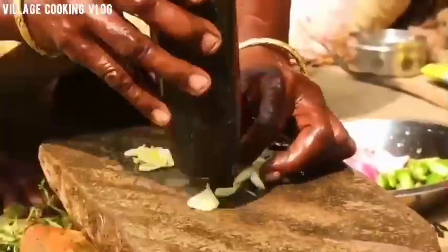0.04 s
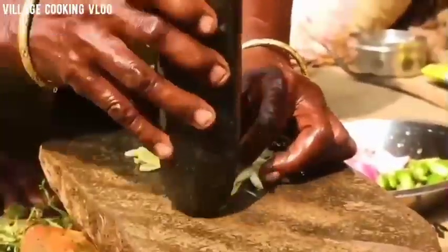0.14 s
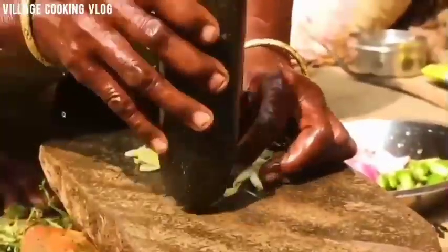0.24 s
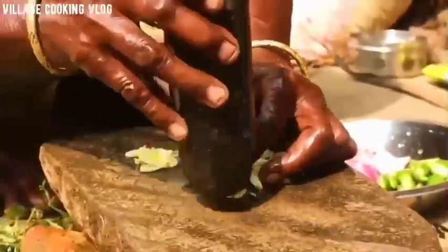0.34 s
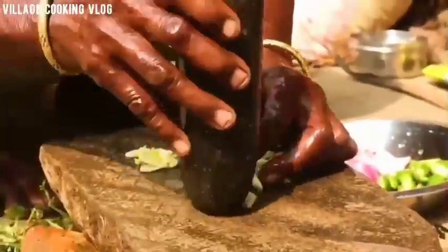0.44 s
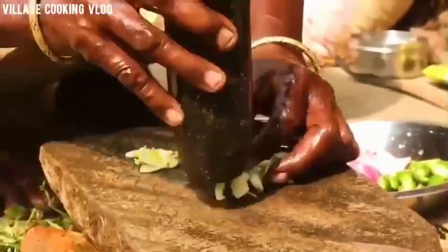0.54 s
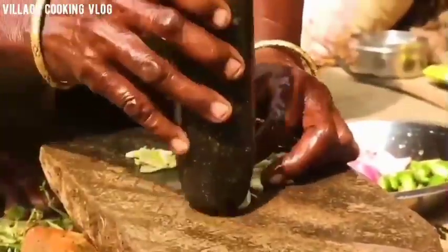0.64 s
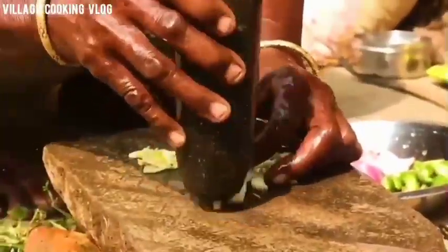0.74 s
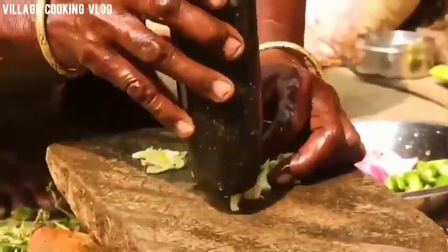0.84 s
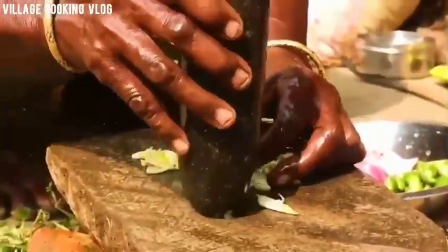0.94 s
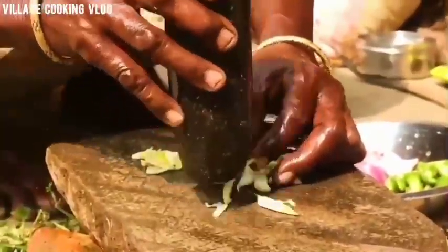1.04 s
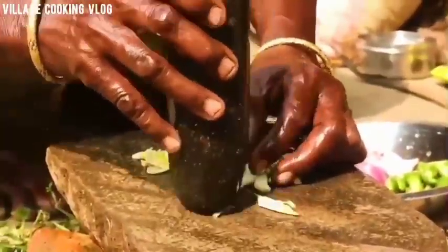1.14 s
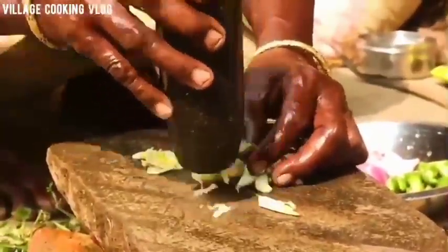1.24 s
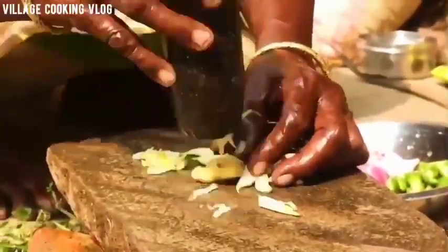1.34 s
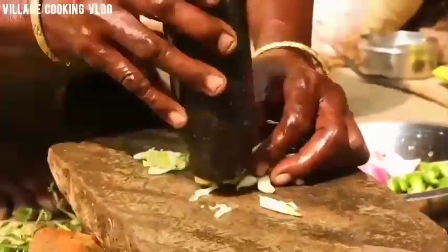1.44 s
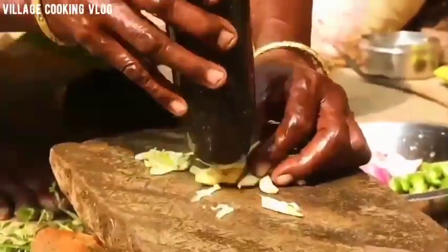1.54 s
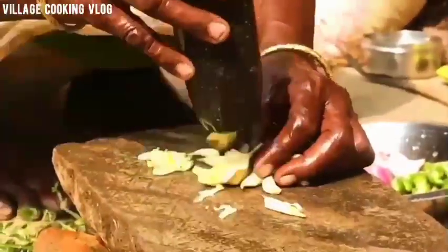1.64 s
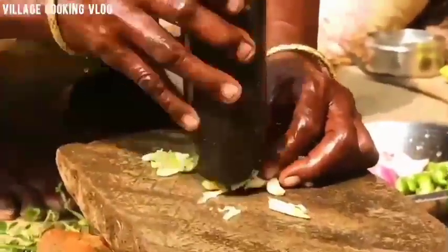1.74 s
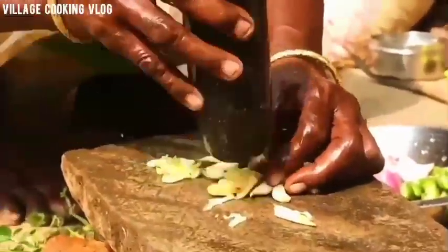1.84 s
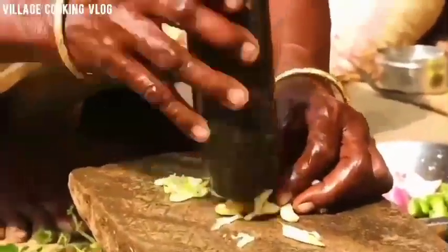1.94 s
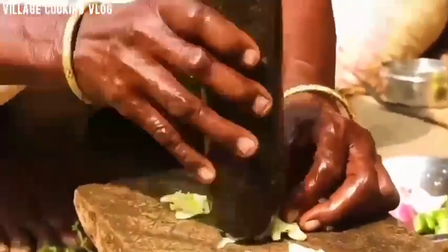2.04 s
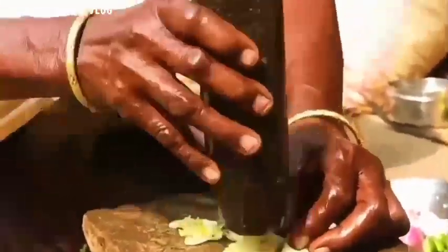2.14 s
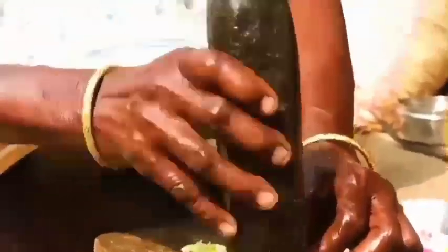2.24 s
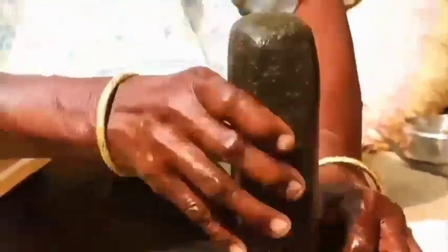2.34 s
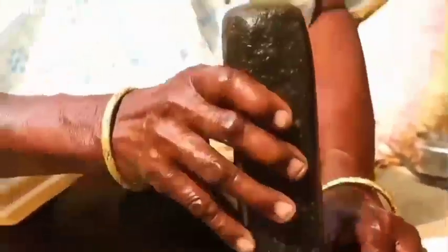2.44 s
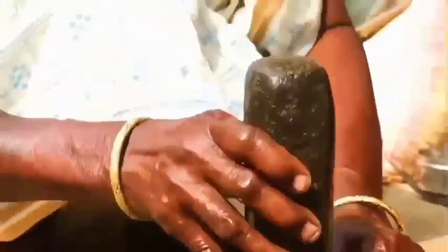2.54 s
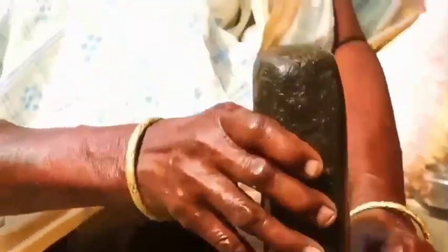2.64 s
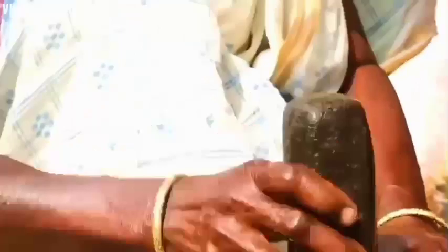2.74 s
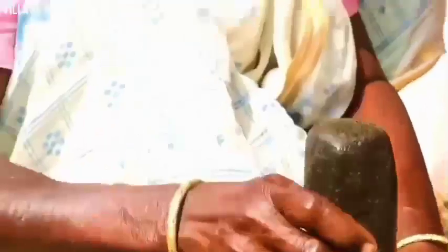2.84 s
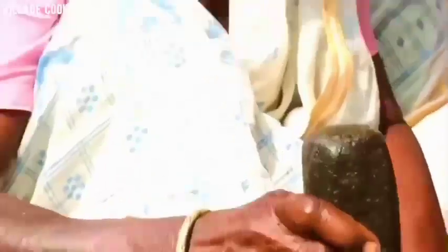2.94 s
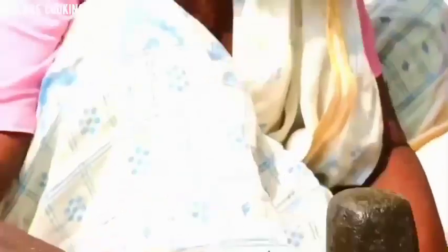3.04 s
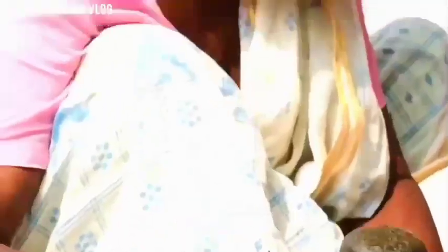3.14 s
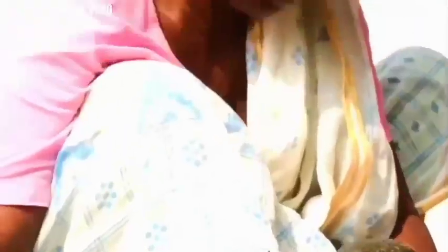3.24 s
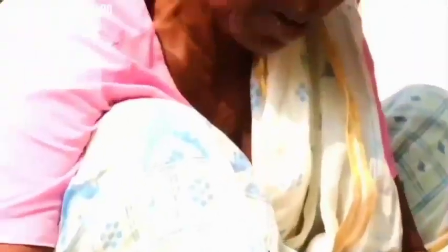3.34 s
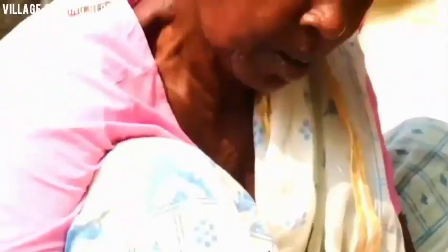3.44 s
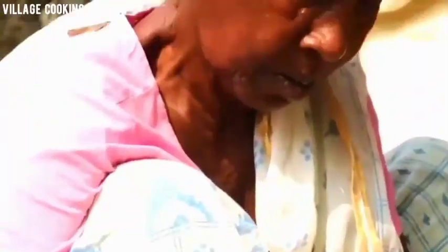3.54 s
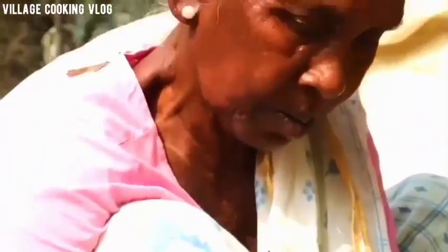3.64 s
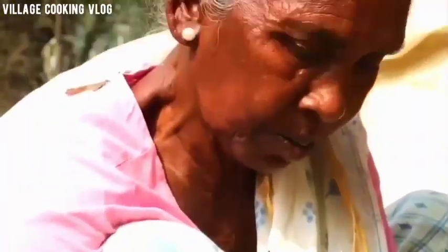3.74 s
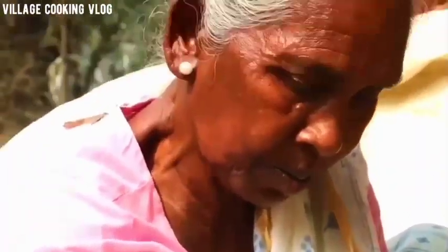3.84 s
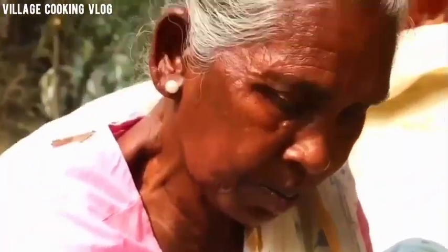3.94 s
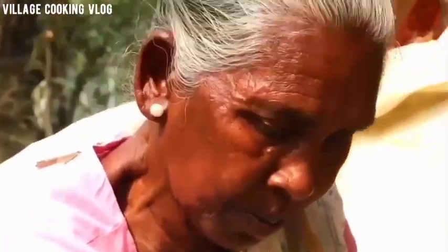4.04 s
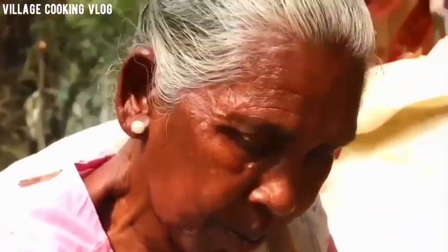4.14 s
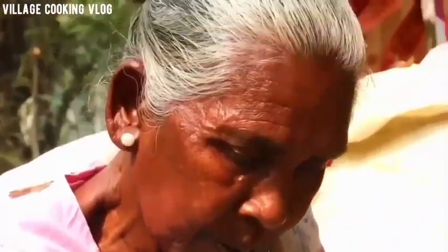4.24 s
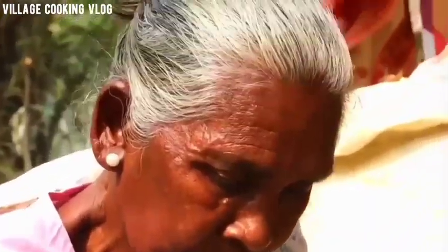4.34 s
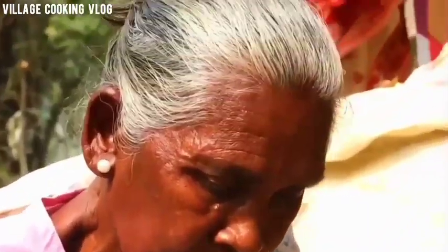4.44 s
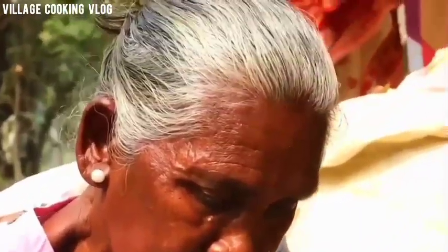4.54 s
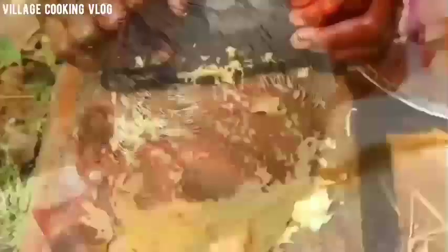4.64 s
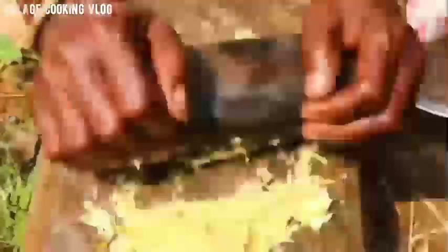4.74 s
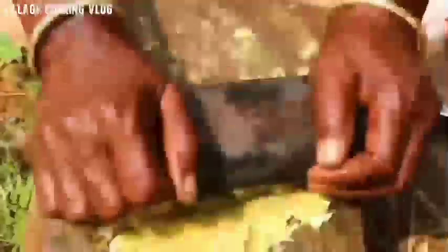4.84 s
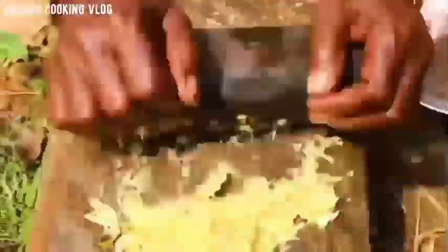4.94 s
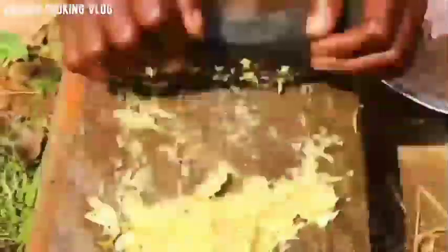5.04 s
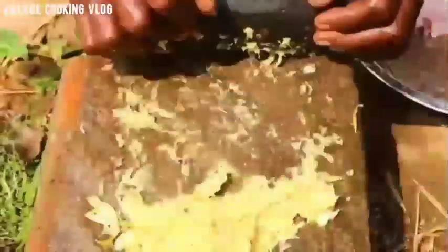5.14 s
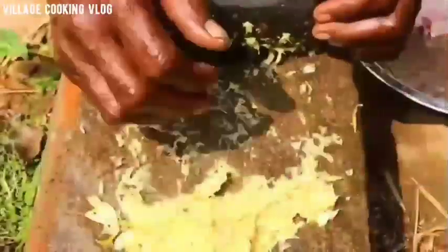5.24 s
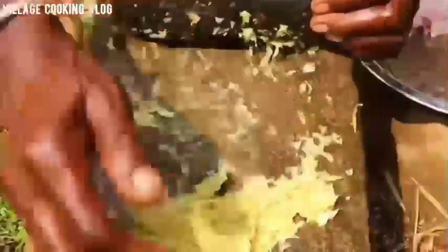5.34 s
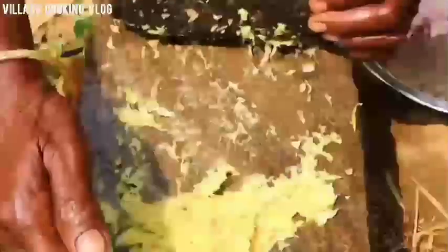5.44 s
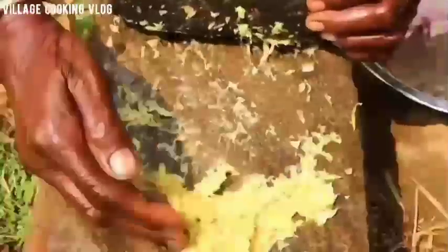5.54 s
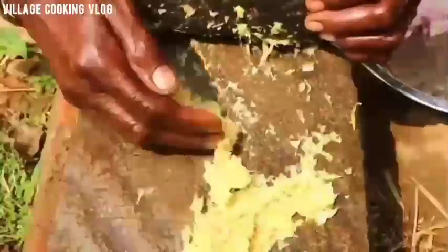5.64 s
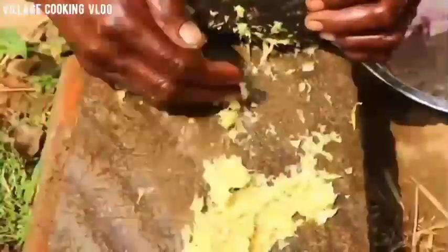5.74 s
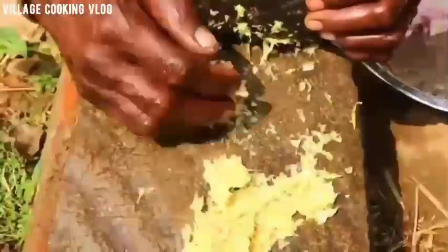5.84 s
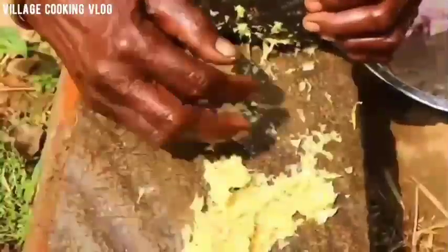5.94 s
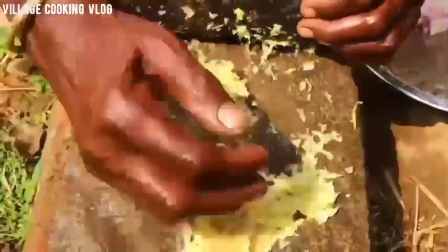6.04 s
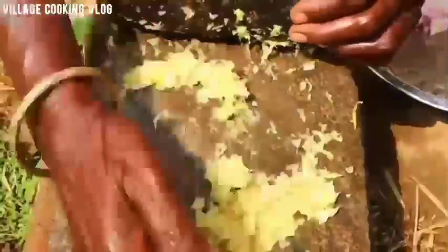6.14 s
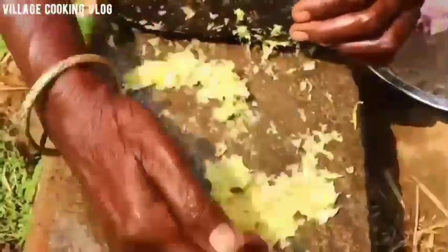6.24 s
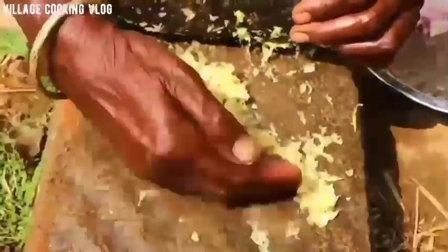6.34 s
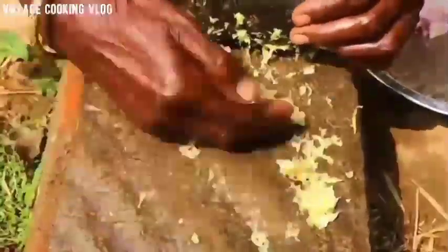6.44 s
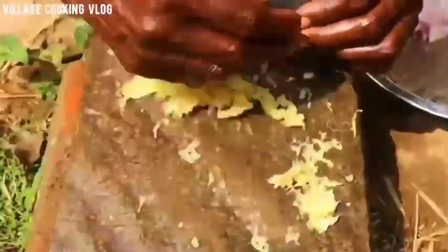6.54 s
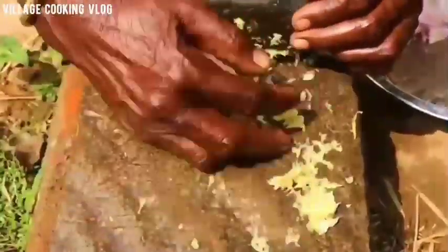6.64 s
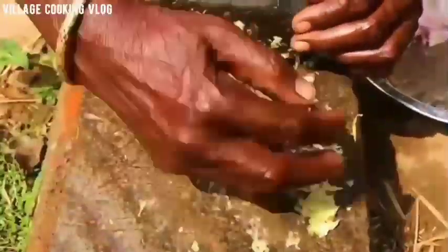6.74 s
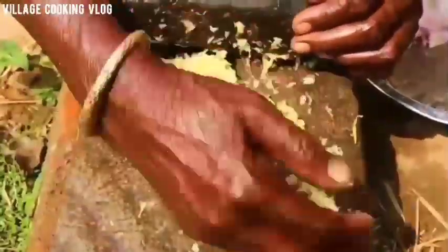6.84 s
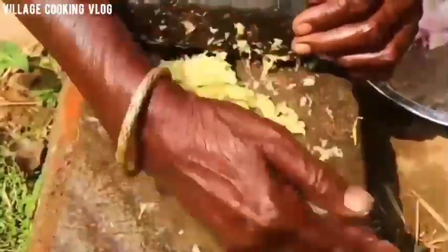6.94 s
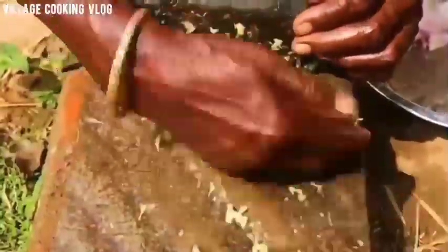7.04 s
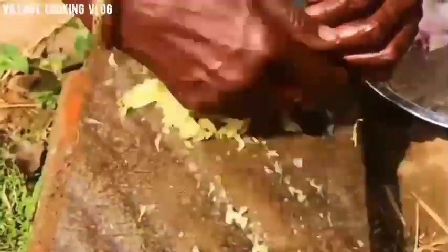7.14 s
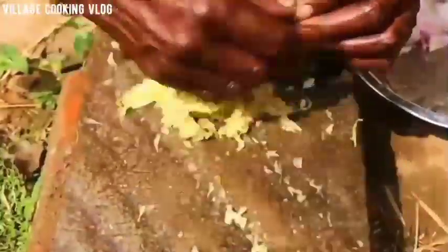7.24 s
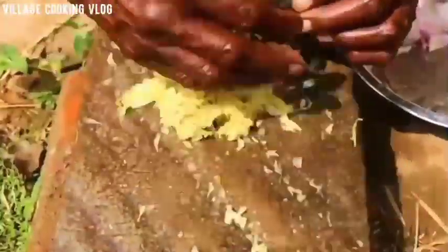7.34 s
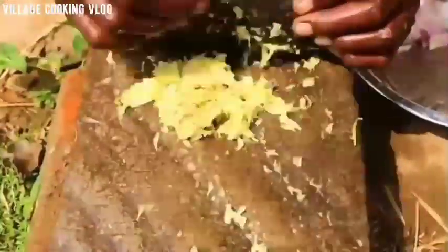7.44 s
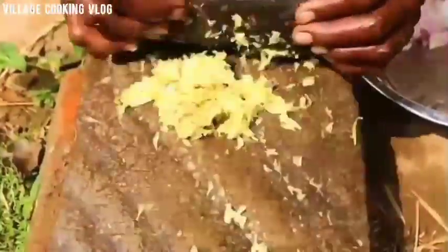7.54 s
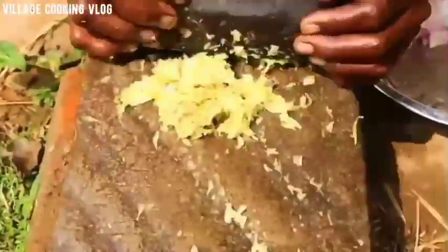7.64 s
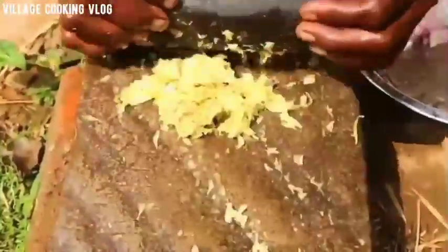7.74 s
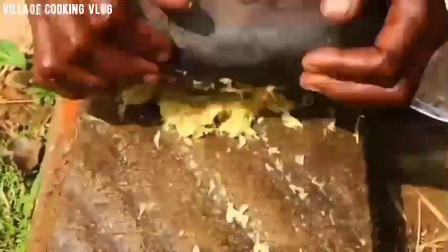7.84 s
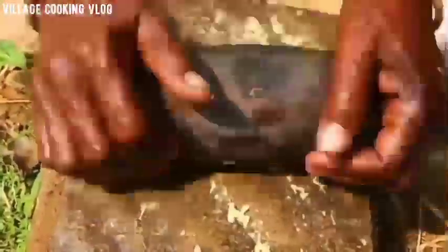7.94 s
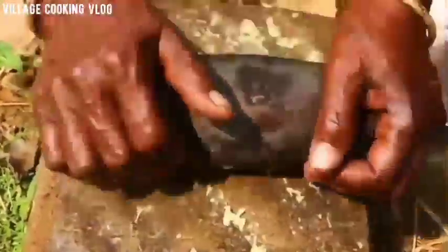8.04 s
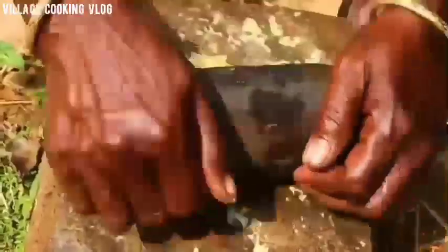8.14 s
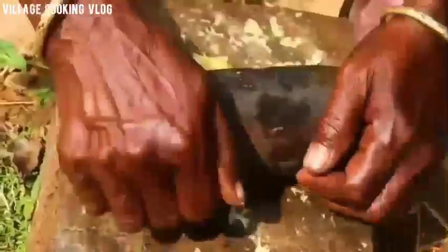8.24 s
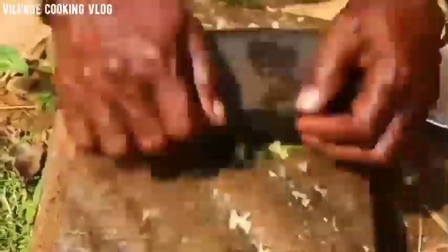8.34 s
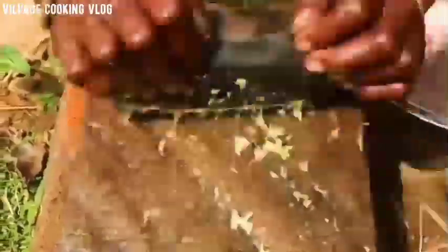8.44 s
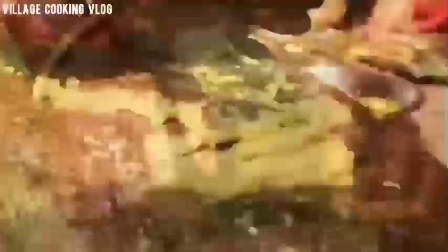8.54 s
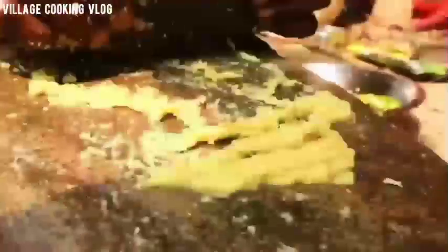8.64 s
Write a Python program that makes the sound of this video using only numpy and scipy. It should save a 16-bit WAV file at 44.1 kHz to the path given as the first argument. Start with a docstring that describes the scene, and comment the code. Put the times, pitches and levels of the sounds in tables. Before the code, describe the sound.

Outdoors, with the microphone close to a stone slab, a heavy pestle pounds juicy food from 0.1 to 4.6 seconds, roughly every quarter second. Each blow is a short, bright, wet crackle with crunch, a fine trailing spray and a modest low thud; some add sharp ticks, and one near 1.4 rings harder, stone on stone. Birds whistle in short husky glides around 2 to 4 kHz; quick nearer chirps and a raspy chatter crowd 3.5 to 4.8. From 4.8 to 5.4 the pestle rolls and drags with gritty scrapes and small knocks. Then it is sparse: soft strokes near 5.7, 5.8, 6.6 to 6.9 and 7.3, a few dull bumps, thin high whistles around 6. A loud, sharp double stone clack comes at 8.2, then light gritty contacts at 8.5 to 8.7. Tree echoes, low drone, distant birds and faint rustle continue behind.

```python
"""Close by, outdoors, a stone pestle pounds juicy food on a slab about four times a second, then rolls and drags over it.
Blows are bursts of filtered noise with a low swing of the slab; bare contacts and strokes ring the modes of the stone.
Birds call as gliding, husky sines, one chatters in rough bands, and decaying noise makes the trees' echo.
Far off lie a low drone, rustling leaves, a faint chorus and a soft hiss, all shaped from noise or short notes."""
import sys
import numpy as np
from scipy import signal
from scipy.io import wavfile
from scipy.ndimage import uniform_filter1d

SR = 44100
rng = np.random.default_rng(int(sys.argv[2]) if len(sys.argv) > 2 else 0)


def materialize(psi):
    """Save the field psi as 16-bit PCM at rate SR to the path in sys.argv[1].

    A 1-D psi becomes a single channel; in a 2-D psi each row is a channel.
    """
    bounded = np.clip(np.atleast_2d(psi).T, -1, 1)
    quanta = np.round(bounded * 32767).astype(np.int16)
    wavfile.write(sys.argv[1], SR, quanta)


N = 382788  # samples

# Modes of pestle and slab. Each row: frequency in Hz, t60 in s, relative level in dB.
STONE_MODES = [(329, 0.047, -6), (475, 0.013, -6.5), (620, 0.016, 11.5), (983, 0.007, 9.5),
               (1330, 0.0051, 10.5), (2070, 0.011, 11.5), (2390, 0.0072, 18), (3600, 0.0036, 15),
               (5520, 0.0064, 6.5), (8400, 0.0029, 9)]
# Upper swings of the slab under a blow. Each row: multiple of the thud frequency, level in dB against the thud setting.
SLAB_SWINGS = [(1.599, -8.5), (2.2, -14.5)]

FADE_S = .018  # fade at both ends of a note


def undb(db):
    """Decibels to an amplitude factor."""
    return 10 ** (np.asarray(db) / 20)


def unit(x):
    """Scale to an RMS of 1."""
    return x / np.sqrt(np.mean(x ** 2))


def decay(t, t60):
    """Exponential decay that falls 60 dB in t60."""
    return 1000. ** (-t / t60)


def band(x, hz, width, order=1):
    """Band-pass around a centre."""
    edges = np.clip([hz - width / 2, hz + width / 2], 10, SR / 2.2)
    return signal.sosfilt(signal.butter(order, edges, "bandpass", fs=SR, output="sos"), x)


def two_ports(mid, side):
    """Left and right port: the shared sound plus and minus the part that differs."""
    return mid + side * np.array([[1], [-1]])


def walk(rate):
    """Random levels held 1 / rate s and slewed twice; spread 1."""
    k = max(int(SR / rate), 1)
    held = np.repeat(rng.standard_normal(N // k + 1), k)
    return unit(uniform_filter1d(uniform_filter1d(held, k), k)[:N])


def slow_noise(count, hz):
    """Noise below a frequency, spread 1."""
    low_pass = signal.butter(4, hz, fs=SR, output="sos")
    return unit(signal.sosfilt(low_pass, rng.standard_normal(count + 400))[400:])  # skips the filter's start


def add(out, x, s, pan_db):
    """Mix a sound in at a time, leaning left or right."""
    i = int(s * SR)
    x = undb(np.array([[.5], [-.5]]) * pan_db) * x
    out[:, i:i + x.shape[1]] += x[:, :N - i]


def swell(loudest_s, rise_s, fall_s, start_db, end_db, fade_s=FADE_S):
    """Start time, place (-1 start, 0 loudest, 1 end) and gain of a sound that rises to a peak and dies away."""
    rise_s, fall_s = max(min(rise_s, loudest_s), .004), max(fall_s, .004)
    t = np.arange(-rise_s, fall_s, 1 / SR)
    place = np.where(t < 0, t / rise_s, t / fall_s)
    fade = np.clip(np.minimum(t + rise_s, fall_s - t) / fade_s, 0, 1)
    level_db = np.where(t < 0, start_db, end_db) * np.abs(place)
    return loudest_s - rise_s, place, fade * undb(level_db)


def glide(place, *hz):
    """Pitch from first over loudest to last; each leg lingers at its ends."""
    ease = 0.73  # 0 = straight glides, 1 = S-shaped
    eased = place - ease * np.sin(2 * np.pi * place) / (2 * np.pi)
    return uniform_filter1d(np.interp(eased, [-1, 0, 1], hz), size=160, mode="nearest")


def thud(db, hz, late_s, t60):
    """The slab rocks on the soil: a low swing that starts a little after contact."""
    t = np.maximum(np.arange(0, .2, 1 / SR) - late_s, 0)
    return undb(db) * np.sin(2 * np.pi * hz * t) * decay(t, t60)


def pounds():
    """Each blow swells briefly, bursts wetly, and a weaker spray follows; then a low thud."""
    # Blows through the food. Each row: time in s, relative levels of crackle, crunch and thud in dB,
    # thud frequency in Hz, crackle t60 in s, left minus right of the food in dB.
    blows = [(0.13, -17, -25, -39, 152, 0.085, -3.5), (0.389, -8, -17.5, -31.5, 149, 0.06, -2.5),
             (0.6322, -16, -27.5, -47, 73, 0.068, -1), (0.8876, -5, -19, -47, 141, 0.023, -1),
             (1.014, -47, -47.5, -45, 75.4, 0.36, 0), (1.1349, -3.5, -17.5, -32, 139, 0.011, -2),
             (1.3789, -8, -40, -62, 223, 0.036, 0), (1.6554, -24, -37, -39.5, 94, 0.13, -1),
             (1.956, -7.5, -19.5, -49.5, 158, 0.048, -1), (2.2335, -3.5, -20.5, -41.5, 253, 0.062, -2),
             (2.4916, -3.5, -19.5, -43, 147, 0.034, -1.5), (2.7526, -2, -22.5, -61, 144, 0.033, 0),
             (3.01, -8.5, -19.5, -43, 138, 0.047, -1.5), (3.0634, -30.5, -40.5, -49, 80.5, 0.11, -4),
             (3.279, -13, -24, -63, 144, 0.064, -1), (3.548, -8.5, -30, -33.5, 150, 0.099, 1),
             (3.823, -22, -23, -41, 93, 0.069, -3), (4.0756, -14, -19.5, -38.5, 123, 0.026, 0),
             (4.34, -19, -22, -45, 152, 0.12, 0), (4.592, -15, -23.5, -34, 160, 0.043, -4),
             (4.804, -31, -37, -56, 116, 0.04, 1), (4.927, -55, -33.5, -50, 66.5, 0.042, 0),
             (6.872, -30, -39, -50, 85.6, 0.063, -2), (7.884, -39, -47, -67, 110, 0.11, -4),
             (8.5163, -64, -47, -49.5, 138, 0.062, -5)]
    # Colour of crackling food. Each row: centre in Hz, width in Hz, relative level in dB.
    crackle_bands = [(8600, 4650, 9), (9400, 1300, -0.5), (11740, 3100, 4), (15200, 1800, 4.5),
                     (6300, 6600, -11.5)]
    out, t = np.zeros((2, N)), np.arange(-.04, .2, 1 / SR)
    after, before = np.maximum(t - .002, 0), np.maximum(.002 - t, 0)  # the burst peaks 2 ms after the blow's time
    grain_db = 2.6 * rng.exponential(size=(len(blows), 1, len(t) // 22 + 1))
    grains = undb(grain_db.repeat(22, axis=2)[..., :len(t)])  # each grain lasts 0.5 ms
    crackle = rng.standard_normal((len(blows), 2, len(t))) * grains
    crackle = two_ports(crackle[:, :1], 0.77 * crackle[:, 1:])
    highs = unit(sum(undb(db) * band(crackle, f, w, order=2) for f, w, db in crackle_bands))
    mids = unit(band(crackle, 5330, 4740, order=2))
    rise = np.exp(-before / 0.0021) + undb(-24.5) * np.exp(-before / 0.018)
    spray = undb(-28.0) * decay(after, 0.18) + undb(-37.0) * decay(after, 0.14)
    for (s, crackle_db, crunch_db, thud_db, hz, t60, pan_db), high, mid in zip(blows, highs, mids):
        fall = 0.41 * np.exp(-after / 0.00061) + decay(after, max(t60, .01)) + spray
        food = undb(crackle_db - 14.5) * high + undb(crunch_db - 3.0) * mid
        add(out, food * rise * fall, s + t[0], pan_db)
        swings = sum(thud(thud_db + 11.5 + db, k * hz, 0.00487, 0.073) for k, db in SLAB_SWINGS)
        add(out, swings + thud(thud_db + 15.5, hz, 0.00487, 0.05), s, 4.5)
    return out


def snaps():
    """Single sharp ticks, from the food or from stone edges meeting: a click that rings one short resonance."""
    # Each row: start in s, ring level in dB, ring frequency in Hz, t60 in ms, left minus right in dB.
    ticks = [(0.3911, -10, 4530, 3, -5), (0.394, -20, 4460, 2.5, -2), (0.8893, -13.5, 5700, 2.7, -7),
             (1.1354, -5, 11500, 1.3, -2), (1.38, -17, 6800, 1.5, -12), (1.6587, -27, 4100, 1.5, 3),
             (2.4926, -5, 8700, 6, -1), (2.4958, -9.5, 8900, 7.4, 3), (2.7536, -2, 14500, 1, -1),
             (2.754, -12, 8900, 6, -3), (3.2822, -22, 4900, 1.5, 0), (3.5494, -7, 7300, 1.2, 1),
             (3.8227, -13.5, 4530, 1.8, 2), (4.0762, -9.5, 5030, 4.6, -9), (4.343, -22, 4650, 1.5, -4),
             (4.5927, -12, 5650, 1.4, -7), (5.137, -37.5, 5000, 1.5, 0), (8.2262, 0, 2480, 9, 2),
             (8.2402, -22, 2460, 13, -2), (8.519, -30, 6000, 3, -4), (8.53, -25, 3500, 2.5, -7),
             (8.5465, -30, 6000, 5, -3)]
    out, t = np.zeros((2, N)), np.arange(0, .02, 1 / SR)
    for s, db, hz, t60_ms, pan_db in ticks:
        tick = np.sin(2 * np.pi * hz * t) * decay(1000 * t, max(t60_ms, .3))
        tick[:2] += undb(-14) * np.array([-1, 1])  # broad click at the front
        add(out, undb(db) * tick, s, pan_db)
    return out


def knocks():
    """Where and how hard the contact falls sets the share of each mode; grit smears the contact."""
    # Stone meets stone or ground. Each row: time in s, relative ring levels near 630, 1330, 1950 and 2430 Hz in dB,
    # relative thud level in dB, thud frequency in Hz, left minus right in dB.
    contacts = [(0.89, -34, -39, -62, -61, -31.5, 142, 2), (1.134, -16, -47, -37, -49, -33, 181, 2),
                (1.379, -10.5, -14, -2, -31.5, -31.5, 231, 3), (2.755, -40.5, -43, -61, -35, -32, 144, 2),
                (3.28, -45, -46, -44, -50, -39, 143, 3), (4.074, -50, -57, -47, -44, -68, 120, 2),
                (4.341, -59, -47, -27.5, -33, -66, 150, -3.5), (4.97, -31.5, -64, -55, -52, -53, 67.3, -1),
                (4.984, -33, -51, -53, -47, -44, 148, 2), (5.008, -39, -58, -65, -45, -44.5, 150, 1),
                (5.167, -36.5, -55, -61, -35, -64, 147, -2), (5.189, -34, -33, -61, -41, -45.5, 160, 2),
                (5.27, -32, -50, -55, -57, -52, 149, 3), (5.31, -42, -59, -58, -57, -62, 151, -2),
                (5.334, -54, -52, -56, -47, -53, 167, 2), (5.389, -22.5, -18.5, -36, -47, -65, 240, -2),
                (6.723, -39.5, -54, -33, -53, -69, 72, -13), (8.225, -38, -8, -34, -17, -40, 149, 3),
                (8.238, -30, -20, -45, -51, -46, 245, 0), (8.544, -33.5, -39, -62, -42, -45, 120, 1),
                (8.673, -44, -49, -91, -17.5, -51, 60.7, 2)]
    detune_spread = .014  # fraction, from knock to knock
    body_db, body_s = -2, .005  # broad dull burst under the ring: peak against the 630 Hz ring level, decay time
    out, t = np.zeros((2, N)), np.arange(0, .2, 1 / SR)
    chances = rng.standard_normal((len(contacts), len(STONE_MODES)))
    for (s, *ring_db, thud_db, hz, pan_db), chance in zip(contacts, chances):
        ring = 0
        for (f, t60, db), detune in zip(STONE_MODES, chance):
            share_db = np.interp(f, [630, 1330, 1950, 2430], ring_db)
            tone = np.sin(2 * np.pi * f * (1 + detune_spread * detune) * t)
            ring = ring + undb(db + share_db) * tone * decay(t, t60)
        contact = undb(-26) * rng.standard_normal(len(t)) * np.exp(-t / 0.0041)
        contact[0] = 1
        ring = signal.fftconvolve(ring, contact)[:len(t)] * (1 - np.exp(-t / 0.00067))
        body = band(rng.standard_normal(len(t)), 1320, 430) * np.exp(-t / body_s)
        body = undb(ring_db[0] + body_db) * body / np.abs(body).max()
        swings = sum(thud(thud_db + 23.0 + db, k * hz, 0.0003, 0.016) for k, db in SLAB_SWINGS)
        ground = swings + thud(thud_db + 10.0, hz, 0.0016, 0.099)
        add(out, ring + body + ground, s + 0.001222, pan_db)
    return out


def bumps():
    """Dull bumps close to the left port: a sudden push that swings back, with a smaller second jolt 2 ms on."""
    # Dull bumps. Each row: time in s, relative level in dB, swing in Hz, t60 in s, edge in ms, left minus right in dB.
    pushes = [(0.179, -12, 150, 0.014, 0.072, 33), (0.561, -16.5, 80, 0.012, 0.096, 26),
              (1.653, -9.5, 85, 0.017, 0.069, 32.5), (2.231, -14, 160, 0.013, 0.057, 23.5),
              (7.194, -23, 83.6, 0.068, 3.4, 15), (7.437, -9.5, 83, 0.0083, 0.044, 27),
              (8.142, -17.5, 117, 0.013, 0.041, 32)]
    out, t = np.zeros((2, N)), np.arange(0, .2, 1 / SR)
    for s, db, hz, t60, edge_ms, pan_db in pushes:
        jolt = np.cos(2 * np.pi * hz * t) * decay(t, t60) * (1 - np.exp(-1000 * t / edge_ms))
        second = .5 * np.interp(t - .0021, t, jolt, left=0)
        slow_swing = thud(-10.5, 0.22 * hz, 0.0018, 0.082)
        add(out, undb(db - 4.0) * (jolt + second + slow_swing), s + 0.0028, pan_db)
    return out


def drags():
    """Pestle or hand drags over the slab: grit slips in dense uneven clicks that ring the stone's modes and hiss."""
    # Each row is a stroke: loudest moment, rise and fall in s, levels of stone rumble, grit and hiss in dB.
    strokes = [(4.936, 0.02, 0.057, -42, -47, -45), (4.983, 0.05, 0.093, -41.5, -40, -43),
               (5.184, 0.038, 0.05, -34, -39, -44), (5.04, 0.061, 0.05, -62, -50, -43),
               (5.14, 0.015, 0.028, -60, -45, -45), (5.225, 0.04, 0.065, -45, -46, -42),
               (5.274, 0.036, 0.061, -34.5, -56, -45), (5.355, 0.041, 0.021, -51, -50, -41.5),
               (5.645, 0.029, 0.032, -47, -61, -73), (5.675, 0.035, 0.055, -39, -56, -82),
               (5.84, 0.13, 0.16, -59, -46, -44.5), (6.569, 0.1, 0.15, -81, -43.5, -42),
               (6.725, 0.081, 0.047, -34.5, -66, -79), (6.872, 0.023, 0.053, -77, -46, -42),
               (7.274, 0.081, 0.1, -63, -64, -43.5), (8.06, 0.055, 0.06, -43, -78.5, -86),
               (8.136, 0.025, 0.015, -39, -57, -71.5), (8.549, 0.048, 0.058, -52, -47, -46),
               (8.63, 0.094, 0.057, -75, -56, -43)]
    start_db, end_db, fade_s = -16, -19, .022  # a stroke's ends against its loudest moment
    click_db = 2.32 * rng.exponential(size=N // 50 + 1).repeat(50)[:N]
    clicks = rng.standard_normal((2, N)) * undb(click_db + 1.6 * walk(90) + 1.47 * walk(30))
    clicks = two_ports(clicks[0], 0.58 * clicks[1])
    ring = [undb(db) * band(clicks, f, 2.3 / t60) * np.sqrt(t60) for f, t60, db in STONE_MODES]
    rumble, grit = unit(sum(ring[:4])), unit(sum(ring[4:7]))
    hiss = band(clicks, 3640, 2100) + 0.5 * band(clicks, 3970, 540)
    hiss = unit(hiss + 1.8 * band(clicks, 5260, 400) + 0.23 * band(clicks, 14600, 7800))
    out = np.zeros((2, N))
    for *times, rumble_db, grit_db, hiss_db in strokes:
        s, _, gain = swell(*times, start_db, end_db, fade_s)
        at = slice(int(s * SR), min(int(s * SR) + len(gain), N))
        gain = gain[:at.stop - at.start]
        for layer, db in ((rumble, rumble_db), (grit, grit_db), (hiss, hiss_db)):
            out[:, at] += layer[:, at] * undb(db) * gain
    return out


def song(notes, waver, husk_hz, octave_db, start_db=-3.5, end_db=-8.5, fade_s=FADE_S):
    """A near sine whose pitch and loudness tremble, with a faint octave and a husky band around it."""
    out, tremble, flutter = np.zeros((2, N)), walk(260), walk(120)
    wander_db = 5.5 * walk(25)  # drift of direction
    for *times, first, loudest, last, db, pan_db, husk_db in notes:
        s, place, gain = swell(*times, start_db, end_db, fade_s)
        hz = glide(place, first, loudest, last)
        at = np.minimum(int(s * SR) + np.arange(len(hz)), N - 1)
        phase = 2 * np.pi * np.cumsum(hz * (1 + waver * tremble[at])) / SR
        husky = np.sin(phase) * (1 + undb(husk_db) * slow_noise(len(hz), husk_hz))
        tone = husky + undb(octave_db) * np.sin(2 * phase)
        add(out, np.sqrt(2) * tone * gain * undb(db + 2.05 * flutter[at]), s, pan_db + wander_db[at])
    return out


def near_bird():
    """A nearer bird: short chirps with fast glides and both ends alike."""
    # Each row: loudest moment, rise and fall in s, first, loudest and last pitch in Hz, level in dB,
    # mean left minus right in dB, husk in dB against the tone.
    chirps = [(1.04, 0.011, 0.0083, 3440, 4200, 4430, -46.5, -2, 6.5),
              (3.52, 0.011, 0.057, 4350, 4620, 4900, -36.5, -10, -15),
              (3.724, 0.025, 0.02, 4130, 4105, 3070, -31.5, 0, -28),
              (3.805, 0.019, 0.014, 4900, 5170, 5430, -36.5, 2, -7),
              (3.822, .014, .01, 3900, 4475, 4500, -32, -4, -25),
              (3.841, 0.015, 0.016, 4480, 4470, 3130, -30, 1, -25),
              (3.898, 0.023, 0.024, 5800, 5100, 4130, -27.5, -5, -10),
              (3.936, 0.02, 0.016, 4550, 4760, 3580, -26.5, -1, -24),
              (3.965, 0.023, 0.014, 4400, 4600, 4600, -45, 3, -10),
              (3.95, 0.064, 0.062, 4000, 3310, 2960, -37, -1, -4),
              (3.6, 0.062, 0.025, 5100, 5300, 5100, -45.5, 1, -9),
              (4.185, 0.014, 0.018, 4900, 4380, 4100, -36, -2, 1),
              (4.38, 0.032, 0.022, 4700, 4940, 4900, -37.5, -3, -5)]
    return song(chirps, 0.0046, 250.0, -36, start_db=-5, end_db=-5, fade_s=.005)


def chatter():
    """A harsh rasp: a wandering buzz splits the moving centre into rough bands, each swelling on its own."""
    # Each row: loudest moment, rise and fall in s, first, loudest and last pitch in Hz, relative level in dB,
    # left minus right in dB, drop per upper band in dB.
    rasps = [(3.559, 0.15, 0.15, 3650, 4470, 4600, -29.5, -1, 3.5),
             (3.699, 0.033, 0.13, 4300, 4390, 4230, -31, -2, 12),
             (3.911, 0.15, 0.061, 4430, 4790, 4120, -32.5, -1, 0.5),
             (4.172, 0.068, 0.18, 4100, 4220, 4740, -33, -2, 0),
             (4.338, 0.09, 0.15, 4814, 4520, 3850, -22, -1.5, 3),
             (4.721, 0.11, 0.13, 4330, 3910, 4180, -30, -3, 5)]
    out = np.zeros((2, N))
    for *times, first, loudest, last, db, pan_db, drop_db in rasps:
        s, place, gain = swell(*times, -12, -32)
        hz = glide(place, first, loudest, last)
        buzz_hz = 520 * (1 + 0.093 * slow_noise(len(hz), 21.8))
        stutter = undb(2.9 * slow_noise(len(hz), 67.0))  # shared by all bands
        for k in range(-2, 7):
            phase = 2 * np.pi * np.cumsum(hz + k * buzz_hz) / SR
            slope_db = -1.5 * k ** 2 if k < 0 else -drop_db * k
            share_db = slope_db + 4.5 * slow_noise(len(hz), 20.0)
            rough = slow_noise(len(hz), 140.0) * stutter * np.sin(phase)
            add(out, rough * gain * undb(db - 5.0 + share_db), s, pan_db)
    return out


def birds():
    """Bird notes grouped by pitch, among them a faint distant crow and a cluck, and a harsh chatterer."""
    # Each row: loudest moment, rise and fall in s, first, loudest and last pitch in Hz,
    # relative level in dB, mean left minus right in dB, husk in dB against the tone.
    mid_notes = [(.162, 0.072, 0.013, 3370, 3670, 3440, -25, -1.5, -35),
                 (.285, 0.019, 0.078, 3640, 3326, 2580, -30, -3, -7.5),
                 (.525, 0.044, 0.067, 3270, 3663, 4060, -27.5, 0.5, -8),
                 (.728, 0.086, 0.016, 3110, 3695, 3550, -25, -2, -31),
                 (.875, 0.076, 0.082, 3380, 3358, 3090, -27.5, -1, -35),
                 (.968, 0.017, 0.018, 3120, 3280, 3400, -42, -3, -17),
                 (1.026, 0.015, 0.01, 3280, 3400, 3300, -29, -3, 5),
                 (1.315, 0.037, 0.067, 3500, 3990, 4010, -33, -9.5, -30),
                 (1.36, 0.023, 0.026, 3960, 3910, 3750, -27.5, 3, -25),
                 (.76, 0.036, 0.076, 3700, 3540, 3620, -49, 0, -22),
                 (1.445, 0.034, 0.042, 3430, 3523, 3660, -32.5, -4, -17),
                 (1.71, 0.03, .045, 4020, 4066, 3750, -32, -6, -29),
                 (1.775, 0.037, 0.048, 3700, 3677, 3620, -21, -4, -11),
                 (1.79, 0.024, 0.033, 3600, 3420, 3260, -37, -3, -3),
                 (2.29, 0.051, 0.18, 3850, 3830, 3790, -52.5, -2, -16),
                 (4.11, 0.024, 0.044, 3660, 3490, 3560, -27, -2, -29),
                 (4.172, 0.047, 0.04, 3450, 3738, 3530, -19, -6, -18),
                 (4.285, 0.031, 0.06, 3380, 3416, 2820, -22.5, -2, -9),
                 (4.355, .02, 0.027, 2850, 3010, 3280, -30, 0, -23),
                 (4.475, 0.038, 0.04, 3750, 3824, 3970, -19.5, 2.5, -16),
                 (4.54, 0.053, 0.048, 4000, 4050, 3750, -39, -1, -4),
                 (4.615, 0.018, 0.052, 3794, 3590, 3180, -21, -2, -25),
                 (4.675, 0.039, 0.043, 3330, 3190, 3350, -25.5, 0, -17),
                 (4.8, 0.054, 0.023, 3440, 3540, 3750, -26.5, -7.5, -7),
                 (5.06, 0.014, 0.1, 3620, 3580, 3200, -39, -2, -6),
                 (5.175, 0.012, 0.017, 3030, 2960, 3070, -37.5, -6, 4),
                 (5.555, 0.022, 0.069, 3680, 3590, 3260, -37, 2, 0),
                 (5.7, 0.05, 0.15, 4060, 3890, 3520, -34.5, 8, -13),
                 (5.855, 0.041, 0.06, 3560, 3663, 3630, -29.5, -0.5, -5.5),
                 (6.545, 0.048, 0.057, 2920, 2850, 3700, -43.5, 0, 5),
                 (6.67, 0.052, 0.067, 3285, 3220, 3220, -44, 1, 9),
                 (6.84, 0.093, 0.084, 3250, 3420, 3490, -43.5, -1.5, -11),
                 (6.14, 0.027, 0.093, 3570, 3430, 3310, -44, 3, 4),
                 (6.935, 0.029, 0.13, 3600, 3650, 3744, -30.5, 0.5, -7),
                 (7.172, 0.059, 0.057, 3500, 2800, 2920, -37, 0, -21),
                 (7.22, 0.05, .06, 3250, 3150, 3080, -43, -2, 1),
                 (7.3, 0.019, 0.13, 3660, 3650, 3850, -36, 4, -15),
                 (7.36, 0.049, 0.063, 3850, 4100, 4050, -42, -4, -21),
                 (7.445, 0.022, 0.084, 3880, 3740, 3350, -38.5, 0, 1.5),
                 (7.54, 0.056, 0.056, 3300, 3300, 3270, -37, 0, -3),
                 (7.64, 0.034, 0.13, 3430, 3530, 3720, -35.5, -1.5, -5.5),
                 (7.69, 0.039, 0.046, 3770, 3914, 3800, -36.5, 5, -26),
                 (7.81, .04, 0.11, 3120, 3320, 3370, -35.5, 6.5, -13),
                 (7.93, 0.053, 0.11, 3330, 3190, 3220, -36, 1, -7)]
    low_notes = [(.03, 0.037, 0.11, 2000, 2188, 2170, -32.5, 1.5, -10),
                 (.35, 0.067, 0.09, 2100, 2192, 2176, -33, 4, -6),
                 (.5, 0.058, 0.47, 2177, 2150, 2175, -49.5, 5, -6),
                 (1.065, 0.023, 0.05, 2440, 2533, 2420, -39.5, -9, -9),
                 (1.36, 0.085, 0.075, 1990, 2080, 1990, -49, 6, 4),
                 (1.85, 0.069, 0.08, 2660, 2340, 2070, -42.5, -2, -12),
                 (2.2, 0.057, 0.12, 2112, 2196, 1940, -33, 7, -8.5),
                 (2.36, 0.035, 0.015, 1967, 1814, 1680, -32, 10, -12),
                 (2.41, 0.053, 0.027, 1910, 2264, 2480, -46, -1, 4),
                 (2.72, 0.044, 0.046, 2250, 2024, 1920, -42.5, 9, -4),
                 (2.79, 0.031, 0.043, 1940, 2160, 2090, -44, 3, -2),
                 (2.97, 0.035, 0.068, 1930, 2074, 2110, -32.5, 10, -7),
                 (3.01, 0.089, .07, 2300, 2630, 2600, -51, 0, 9.5),
                 (3.15, 0.05, 0.1, 1950, 2040, 2020, -39, 11, -12),
                 (3.215, 0.086, 0.043, 2150, 2460, 2580, -37, 2.5, -8),
                 (3.27, 0.045, 0.064, 2146, 2290, 2360, -43.5, 3, -1),
                 (3.35, 0.085, 0.063, 1812, 2090, 2150, -35.5, 5, -30),
                 (3.84, 0.12, 0.02, 1750, 2386, 2500, -41.5, 1, -11),
                 (4.115, 0.077, 0.094, 1750, 2410, 2530, -32, 5, -6.5),
                 (4.51, 0.082, 0.082, 1740, 2585, 2850, -43.5, 4, 4.5),
                 (6.17, 0.046, 0.41, 2066, 2130, 2035, -49, 5, -2),
                 (6.95, 0.13, 0.18, 1990, 1900, 1850, -47, -8, -25),
                 (8.05, 0.04, 0.094, 1866, 1830, 1810, -42.5, 3, -5),
                 (8.045, 0.048, 0.066, 2100, 2570, 2400, -40.5, 3, -21),
                 (8.47, 0.1, 0.16, 1960, 2430, 2620, -45.5, -3, -17)]  # same columns
    high_notes = [(5.465, 0.037, 0.076, 5130, 4840, 4240, -37.5, -3, -3),
                  (5.61, 0.2, 0.071, 4820, 4970, 5050, -42, 2, -27),
                  (5.975, 0.059, 0.048, 5250, 5110, 5230, -40.5, -15, -32),
                  (6.015, 0.019, 0.023, 4800, 4870, 4970, -39, 4, -15),
                  (6.07, 0.027, 0.0082, 4920, 4900, 5270, -29, 1, -16),
                  (6.13, 0.06, 0.13, 4840, 4823, 4700, -34.5, -2.5, -25),
                  (6.292, 0.033, 0.031, 4750, 4590, 4330, -30.5, -2, -37),
                  (6.34, 0.023, 0.11, 4400, 4490, 4380, -34, 4, -28),
                  (6.365, 0.03, 0.13, 4490, 4750, 4530, -42.5, 2.5, -4)]  # same columns
    deep_notes = [(.69, 0.064, 0.031, 1300, 1290, 1320, -43.5, 8, -7.5),
                  (.76, 0.054, 0.027, 1612, 1580, 1470, -48, 6, 7),
                  (1.056, 0.034, 0.039, 1208, 1350, 1230, -36.5, 3.5, -4.5),
                  (1.775, 0.014, 0.029, 1340, 1280, 1370, -39.5, 6, -5),
                  (2.05, 0.11, 0.17, 1402, 1412, 1440, -48, 10, -5),
                  (2.185, 0.03, 0.084, 1510, 1630, 1690, -39.5, 6, 2),
                  (6.17, 0.038, 0.045, 1040, 1070, 1050, -47, 1, -7),
                  (6.4, 0.12, 0.14, 1075, 1077, 1015, -58.5, 18, -31),
                  (8.065, 0.036, 0.048, 406, 665, 820, -43.5, 1, 3),
                  (8.09, 0.048, 0.07, 1450, 1693, 1510, -42, 2, -2),
                  (8.475, 0.02, 0.039, 1570, 1414, 1270, -43, -10, -5),
                  (8.55, 0.059, 0.11, 1282, 1267, 1243, -40.5, -0.5, -15)]  # same columns
    calls = song(mid_notes, 0.0078, 260.0, -33.5) + song(low_notes, 0.012, 300.0, -30)
    calls += song(high_notes, 0.01, 830.0, -25) + song(deep_notes, 0.014, 260.0, -24)
    return undb(-4.5) * (calls + chatter())


def trees(x):
    """Scattered echoes from leaves and walls, different at each port."""
    break_s = 4.812  # echoes of earlier sounds stop short here
    t = np.arange(0, .45, 1 / SR)
    echo = rng.standard_normal((2, len(t))) * decay(t, 0.37) * (1 - np.exp(-t / 0.0048))
    echo = echo / np.sqrt(np.sum(echo ** 2, axis=1, keepdims=True))
    parts = np.split(x, [int(break_s * SR)], axis=1)
    return np.hstack([signal.oaconvolve(part, echo, axes=1)[:, :part.shape[1]] for part in parts])


def chorus(count=240):
    """Many far birds: short gliding notes at random times and pitches, mostly heard through the trees."""
    out, t = np.zeros((2, N)), np.arange(0, .16, 1 / SR)
    husks = slow_noise(count * len(t), 220.0).reshape(count, -1)
    for (when, pitch, slide, size, lean), husk in zip(rng.random((count, 5)), husks):
        hz = 1350 * 2.4 ** pitch * (1 + 1.49 * (slide - .5) * t)
        note = np.sin(2 * np.pi * np.cumsum(hz) / SR) * (0.5 + husk) * np.hanning(len(t))
        add(out, undb(1.7 * size) * note, when * N / SR, 8 * (lean - .5))
    return unit(trees(out) + 0.1 * out)


def wide_noise(hz, width, wide, lean_db):
    """A band of noise that differs between the ports and leans to one side."""
    mid, side = band(rng.standard_normal((2, N)), hz, width, order=2)
    return two_ports(mid, wide * side) * undb([[lean_db / 2], [-lean_db / 2]])


def around():
    """Flickering half-octave bands of air; a wavering drone near 75 Hz with upper tones; far birds; leaves rustle."""
    # Background over time. Each row: time in s, relative levels of low drone, outdoor air and rustle in dB.
    levels = [(0.0, -42, -59, -47.5), (1.14, -43, -58, -62.5), (1.57, -45, -54.5, -61),
              (1.72, -58, -66.5, -57), (1.98, -65, -58, -54.5), (2.17, -54, -54.5, -61),
              (2.54, -50.5, -63.5, -57.5), (3.04, -43, -59.5, -58.5), (3.94, -47, -54.5, -50),
              (4.5, -44.5, -53.5, -47.5), (5.249, -46, -62, -46), (5.66, -48, -60.5, -58.5),
              (6.16, -51.5, -59.5, -53), (6.48, -49.5, -65, -56), (6.79, -49.5, -52.5, -61),
              (7.47, -46, -60.5, -57.5), (8.07, -48.5, -56.5, -58), (8.68, -50.5, -63, -53)]
    # Colour of the air. Each row: frequency in Hz, relative level in dB per Hz.
    air_colour = [(15, -42), (25, 14), (49, -8), (83, -26), (159, -3.5), (422, -12.5), (1120, -10),
                  (1880, -16.5), (2820, -69), (3600, -11), (4240, -10), (11300, -79), (14000, -52),
                  (15200, -48), (16500, -58)]
    # Leaves, each band stirring alone. Each row: centre in Hz, width in Hz, relative level in dB.
    leaf_bands = [(2500, 2060, 4.5), (5000, 3900, -1), (7350, 2800, -7), (10600, 3200, -4.5)]
    s, *columns = np.transpose(levels)
    drone_db, air_db, rustle_db = (np.interp(np.arange(N) / SR, s, c) for c in columns)
    air, (colour_hz, colour_db), sway = 0, np.transpose(air_colour), walk(0.805)
    for hz in 28 * 2 ** np.arange(0, 9.3, .5):
        db = np.interp(np.log(hz), np.log(colour_hz), colour_db) + 1.33 * sway + 4.3 * walk(10.5)
        air = air + undb(db) * wide_noise(hz, hz / 3.7, 0.55, 1.0)
    drone = unit(wide_noise(74.47, 9.8, 0.1, 0.92))
    drone += undb(-4.5) * unit(wide_noise(132.6, 107, 0.09, 0.65))  # broad hum under the tones
    drone += undb(-9.5) * unit(wide_noise(114.6, 9.4, 0.15, 1.48))
    drone += undb(-10.0) * unit(wide_noise(156.5, 10.7, 0.15, 1.3))
    rustle = unit(sum(wide_noise(hz, w, 1.0, -0.89) * undb(db + 5.4 * walk(13)) for hz, w, db in leaf_bands))
    hiss = undb(air_db + 8) * unit(air)
    return hiss + undb(-54) * chorus() + undb(drone_db) * drone + undb(rustle_db) * rustle


def scene():
    """Stone work close by, with a trace of echo; birds heard direct and through the trees; air around."""
    stone = pounds() + snaps() + knocks() + bumps() + drags()
    far, near = birds(), near_bird()
    calls = far + near
    port_lag = 0.023  # all-pass coefficient: the left port hears the birds a little later
    late = signal.lfilter([port_lag, 0, 1], [1, 0, port_lag], calls[0])
    echoes = trees(undb(-1) * far + undb(-3) * near + undb(-27) * stone)
    return stone + np.array([late, calls[1]]) + echoes + around()


def record(dry):
    """The microphone drops the deep bass; the loudest peaks clip; the top is cut at 16 kHz."""
    dry = signal.sosfilt(signal.butter(3, 48., "highpass", fs=SR, output="sos"), dry)
    top_cut = signal.ellip(10, .2, 70, 16000, fs=SR, output="sos")
    return signal.sosfilt(top_cut, np.clip(dry, -1, 1))


dry = scene()
out = record(dry)
materialize(out)
```